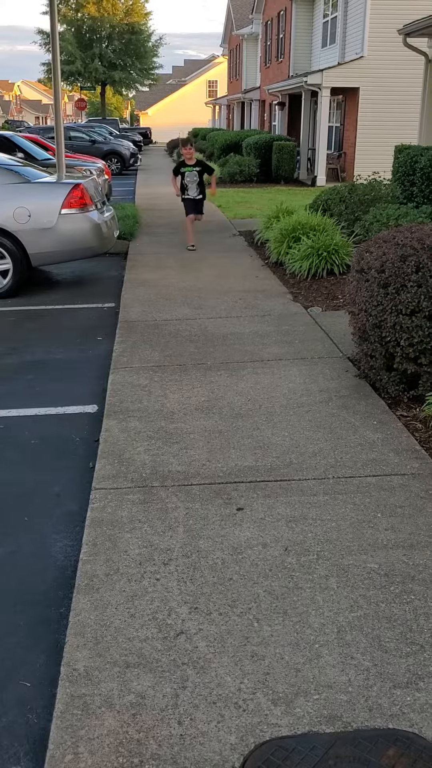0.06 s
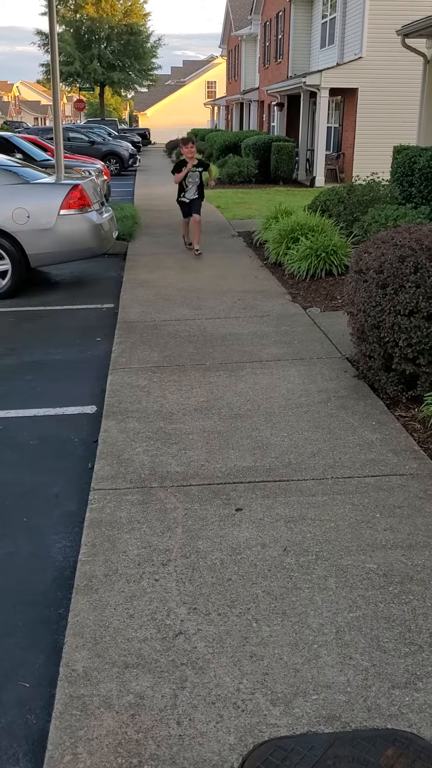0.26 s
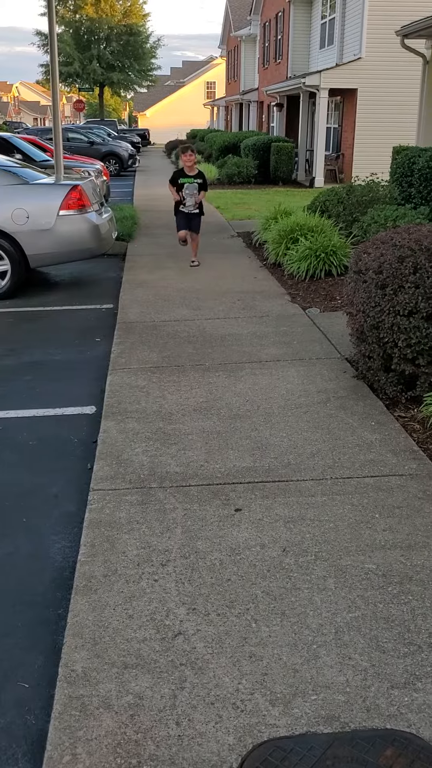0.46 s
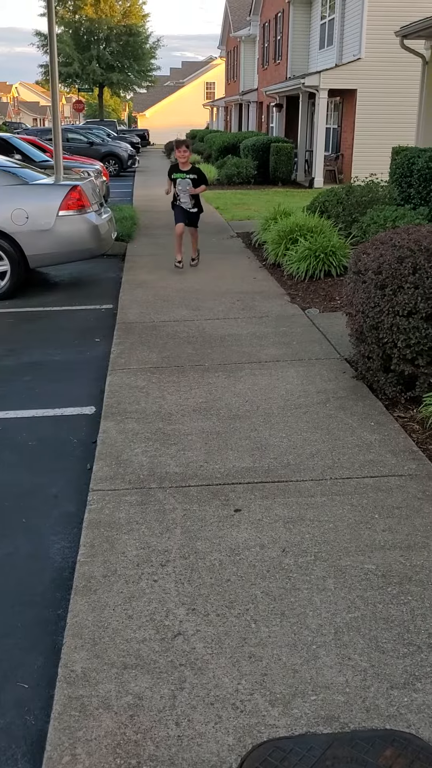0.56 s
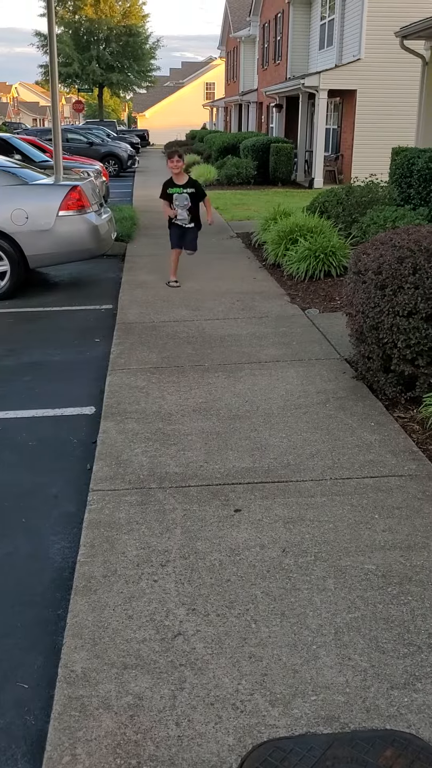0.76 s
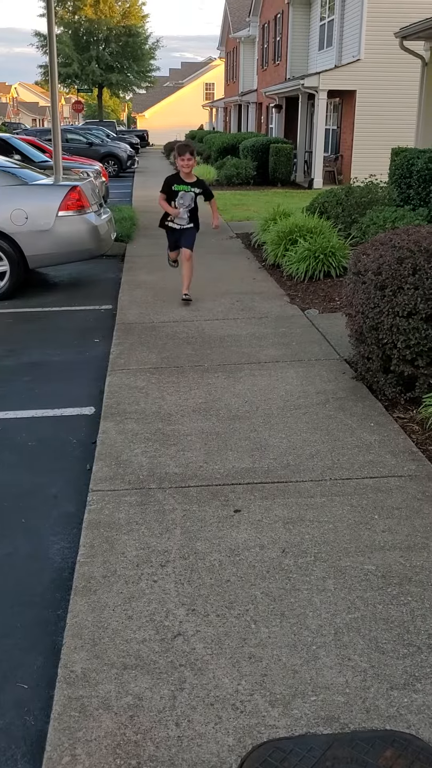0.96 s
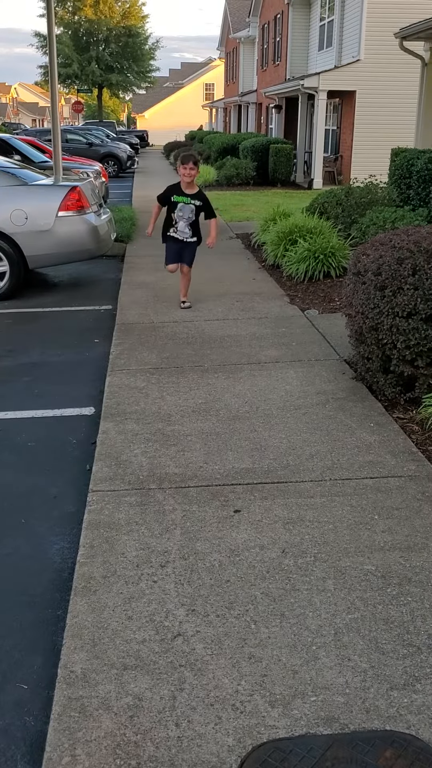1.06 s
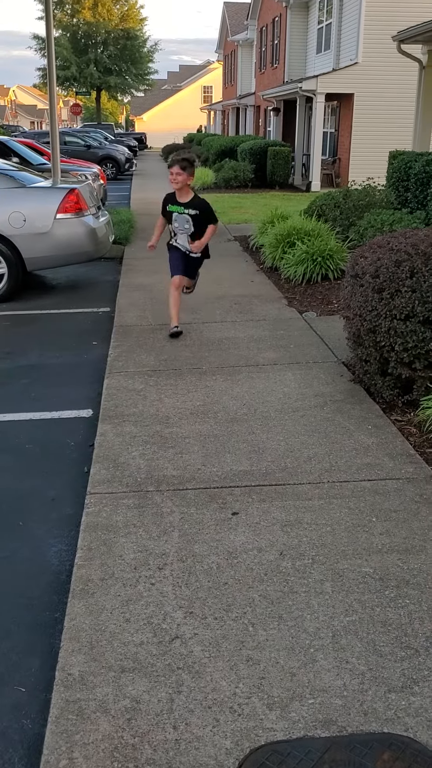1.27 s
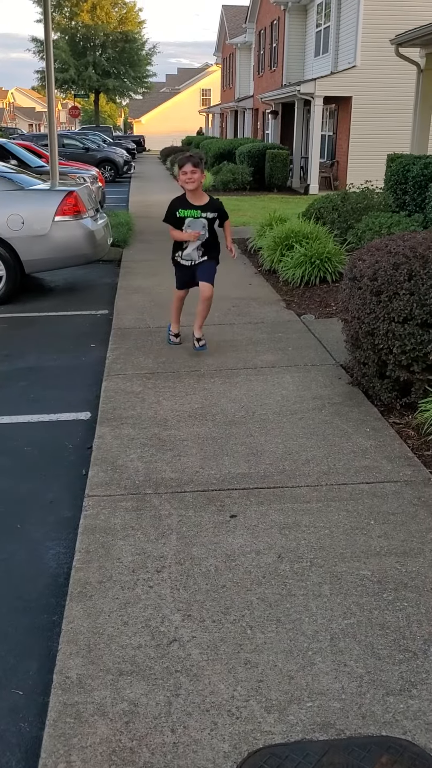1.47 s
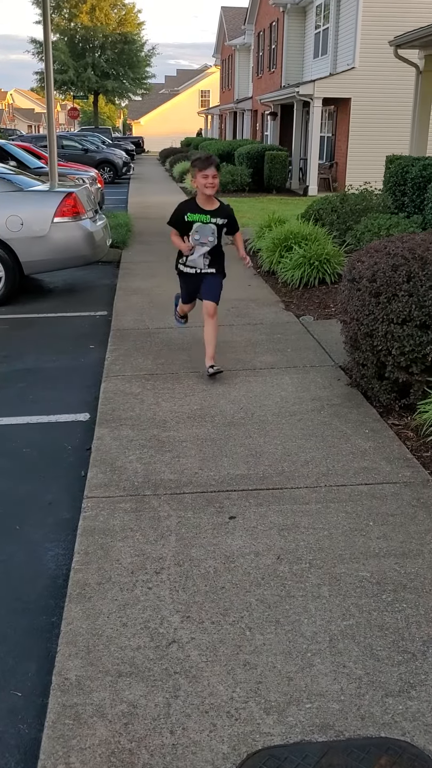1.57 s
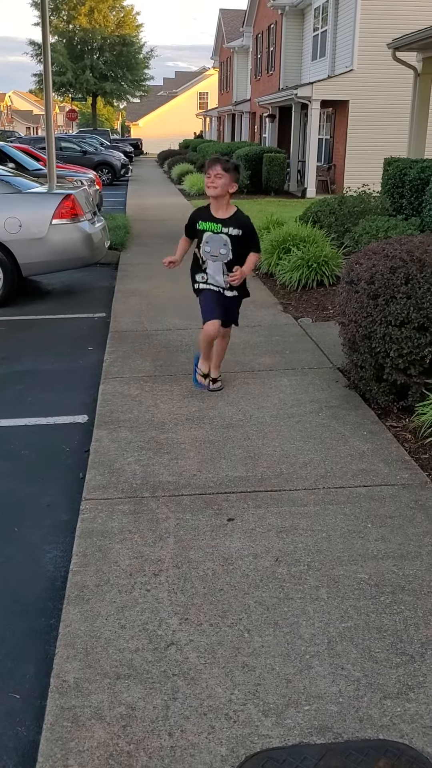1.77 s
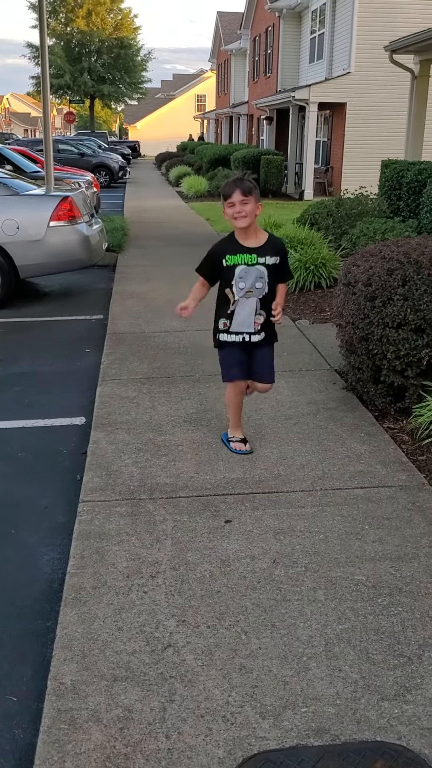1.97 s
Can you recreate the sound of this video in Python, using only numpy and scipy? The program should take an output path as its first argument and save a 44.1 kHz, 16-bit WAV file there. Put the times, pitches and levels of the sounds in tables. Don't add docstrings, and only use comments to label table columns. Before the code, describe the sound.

A child's flip-flops slap a concrete sidewalk at a steady run, approaching. Soft, distant slap at 0.15 s, firmer ones at 0.45 and 0.78, a softer one at 1.09, a hard bright crack at 1.37, the loudest at 1.68, and a duller, poppy slap at 1.99. Light heel taps, gritty scuffs and growing cloth swishes fall between; short street echoes, faint hiss, low traffic and hum.

```python
import sys
import numpy as np
from scipy import signal
from scipy.fft import rfft, irfft, next_fast_len
from scipy.io import wavfile
from scipy.ndimage import uniform_filter1d

SR = 44100
rng = np.random.default_rng(int(sys.argv[2]) if len(sys.argv) > 2 else 0)


def generate_wav(sig):
    pcm = np.round(np.clip(np.atleast_2d(sig).T, -1, 1) * 32767).astype(np.int16)
    wavfile.write(sys.argv[1], SR, pcm)


def volts_from_db(level):
    exponent = np.asarray(level, float) / 20
    return 10 ** exponent


N = 88729

# start_s, crack_db, sole_ring_hz, strap_ring_hz, echo_delay_s
SOLE_SLAPS = [
    (0.149, -27.5, 1670, 2800, 0.012),
    (.4537, -22.5, 1730, 2500, .0125),
    (0.7795, -23.5, 1660, 3700, .0132),
    (1.0858, -26, 3800, 3550, .0140),
    (1.3671, -17.5, 3400, 4220, .0155),
    (1.6810, -7.5, 1860, 2510, 0.016),
    (1.9905, -22, 3860, 2060, 0.019),
]
# freq_hz, t60_s
NEAR_DECAY = [(300, 0.27), (2500, 0.22), (8000, 0.14)]


def unit(x):
    return x / np.sqrt(np.mean(x ** 2) + 1e-20)


def along(points, hz):
    f, v = np.transpose(points)
    return np.interp(np.log(hz + 1), np.log(f + 1), v)


def filtered(x, response):
    m = next_fast_len(x.shape[-1] + 8192)
    spectrum = rfft(x, m) * response(np.fft.rfftfreq(m, 1 / SR))
    return irfft(spectrum, m)[..., :x.shape[-1]]


def peak(hz, centre_hz, width_hz):
    return 1j * hz * width_hz / (centre_hz ** 2 - hz ** 2 + 1j * hz * width_hz)


def add(track, start_s, x):
    part = track[..., round(start_s * SR):][..., :x.shape[-1]]
    part += x[..., :part.shape[-1]]


def rush(colour, patchy_db):
    # freq_hz, left_right_correlation
    likeness = [(60, 0.97), (180, 1), (550, 0.78), (1650, 0.28), (4970, -0.27), (15000, 0.14)]
    z = signal.stft(rng.standard_normal((2, N)), nperseg=512)[2]
    field = uniform_filter1d(rng.standard_normal(z.shape[1:]), 6, 0)
    field = uniform_filter1d(field, 8, 1)
    pair = signal.istft(z * volts_from_db(patchy_db * unit(field)), nperseg=512)[1][:, :N]

    def mid_side(hz):
        turn = np.arccos(np.clip(along(likeness, hz), -1, 1)) / 2
        return colour(hz) * [np.cos(turn), np.sin(turn)]

    mid, side = filtered(pair, mid_side)
    return unit(np.array([mid + side, mid - side]))


def traffic():
    # freq_hz, density_db_per_hz
    rumble = [(22, -77), (45, -2), (120, -9), (190, -10.5), (400, -14.5), (900, -21), (1600, -27),
              (2600, -48)]
    return volts_from_db(-51.5) * rush(lambda f: volts_from_db(along(rumble, f)) * (f < 4000), patchy_db=3.5)


def fan_hum():
    # centre_hz, width_hz, level_db
    bands = [(77, 54, -52.5), (117.2, 2.3, -56), (349.5, 73, -59)]
    hum = np.zeros((2, N))
    for hz, width_hz, db in bands:
        hum += volts_from_db(db) * rush(lambda f: np.abs(peak(f, hz, width_hz)) ** 2, patchy_db=-1.2)
    return hum


def gated_hiss():
    # freq_hz, density_db_per_hz
    hiss_colour = [(1200, 4), (2000, -10), (3200, -2.5), (5000, -14), (7500, -16.5), (9500, -9.5),
                   (11500, -19), (15800, -32)]
    level_db, depth_db, close_s, bend = -55, 25, 0.34, 1.24
    t = np.arange(N) / SR
    openings_s = np.array([-.16] + [row[0] - .01 for row in SOLE_SLAPS])
    since_s = t - openings_s[np.searchsorted(openings_s, t) - 1]
    gate = volts_from_db(level_db - depth_db * (since_s / close_s) ** bend)
    return gate * rush(lambda f: volts_from_db(along(hiss_colour, f)) * (f > 900), patchy_db=-2.5)


def cloth():
    # centre_s, level_db, half_length_s
    swings = [
        (0.048, -71.5, 0.051),
        (0.602, -67.5, 0.079),
        (0.883, -65.5, 0.11),
        (1.184, -62.5, 0.072),
        (1.315, -55, 0.065),
        (1.521, -57, 0.072),
        (1.82, -49, 0.11),
        (1.97, -60.5, 0.056),
    ]
    # freq_hz, density_db_per_hz
    cloth_colour = [(1470, -14), (2500, -9.5), (4710, -9.5), (6310, -5), (7360, -10.5), (9000, -3),
                    (11400, -19.5), (15800, -9.5)]
    t = np.arange(N) / SR
    swing = sum(volts_from_db(db) * np.exp(-((t - s) / half_s) ** 2) for s, db, half_s in swings)
    return swing * rush(lambda f: volts_from_db(along(cloth_colour, f)) * (f > 900), patchy_db=3.0)


def taps(track):
    # start_s, level_db, ring_hz, t60_s
    contacts = [(.060, -35, 860, 0.0096), (.142, -32.5, 356, 0.044), (0.281, -40, 620, 0.024),
                (.651, -42.5, 600, 0.028), (.766, -41, 526, 0.078), (1.0726, -28, 870, 0.016),
                (1.339, -41, 840, 0.023), (1.0721, -41, 1620, 0.01), (.4545, -31, 568, 0.018),
                (1.352, -35.5, 338, 0.039), (1.566, -39.5, 490, 0.025), (1.801, -31, 306, 0.02),
                (1.961, -38, 825, 0.014), (1.981, -33, 406, 0.033)]
    t = np.arange(3000) / SR
    onset = 1 - np.exp(-t / 0.0002)
    for s, db, hz, t60_s in contacts:
        add(track, s, -volts_from_db(db - 60 * t / t60_s) * np.sin(2 * np.pi * hz * t) * onset)


def tail(t60):
    hz, t, z = signal.stft(rng.standard_normal((2, SR // 2)), SR, nperseg=128)
    decay = volts_from_db(-60 * t / along(t60, hz)[:, None])
    mid_side_gain = np.array([hz > -1, 1.28 * hz / (hz + 900)])[..., None]
    mid, side = signal.istft(z * decay * mid_side_gain, SR, nperseg=128)[1]
    return np.array([mid + side, mid - side]) / np.linalg.norm(mid)


def scuffs(track):
    # start_s, level_db, centre_hz, length_s
    grains = [(0.144, -58.5, 2600, 0.0018), (0.151, -48.5, 1630, 0.0033), (0.423, -52, 4300, 0.0034),
              (0.4394, -40.5, 10400, 0.0017), (0.443, -36.5, 5100, .0014), (0.4382, -38.5, 1500, .0015),
              (0.4563, -33.5, 3890, 0.0011), (.7772, -34.5, 2700, .0008), (1.0879, -45.5, 2800, 0.00096),
              (1.0882, -59, 6540, 0.00092), (0.163, -50.5, 2900, 0.0034), (1.6775, -28, 3600, 0.00084),
              (0.772, -56, 3600, 0.0051), (0.7944, -48, 3960, 0.0013), (1.092, -72, 3520, .0015),
              (1.345, -51.5, 3960, 0.0043), (1.351, -47.5, 3820, 0.0035), (1.4, -68, 4130, 0.001),
              (1.404, -54, 3450, 0.0013), (1.468, -54, 2960, 0.0023), (1.666, -54, 3630, 0.0032),
              (1.714, -37.5, 2600, .0018), (1.72, -44, 3120, .006), (1.804, -49.5, 2090, .003),
              (1.831, -49.5, 1770, .006), (1.964, -45.5, 4870, .002), (1.978, -36, 3320, .002),
              (1.992, -29, 1100, .0015)]
    t = np.arange(3000) / SR
    for s, db, hz, length_s in grains:
        grit = filtered(rng.standard_normal(len(t)) ** 3, lambda f: peak(f, hz, hz * 0.68) ** 2)
        puff = volts_from_db(db) * unit(grit) * np.exp(-(t / length_s - 2) ** 2)
        add(track, s - length_s * 2, puff * volts_from_db([[.6], [-.6]]))
        add(track, s, volts_from_db(-10.5) * signal.fftconvolve(puff[None], tail(NEAR_DECAY), axes=1))


def echo(x, pop_echo_db=-14, spread_s=0.0031, top_hz=4300):
    def dulling(hz):
        bass_shelf = (volts_from_db(pop_echo_db) + 1j * hz / 600) / (1 + 1j * hz / 600)
        return bass_shelf / (1 + 1j * hz / top_hz) ** 2

    dull = filtered(x, dulling)
    smear = rng.standard_normal((2, 512)) * np.exp(-np.arange(512) / SR / spread_s)
    blur = signal.fftconvolve(dull[None], smear / np.linalg.norm(smear[0]))[:, :len(x)]
    return dull + 0.24 * blur


def street(track, start_s, x, delay_s):
    # freq_hz, t60_s
    far_decay = [(300, 1), (2500, 1), (8000, 0.94)]
    near_db, far_db, build_s, clump_db = -7.5, -27.5, .006, 4.0
    add(track, start_s, x)
    echo_db = -14.0 - 5.0 * (start_s - 1.76)
    add(track, start_s + delay_s, volts_from_db(echo_db) * echo(x))
    wet = volts_from_db(near_db) * tail(NEAR_DECAY) + volts_from_db(far_db) * tail(far_decay)
    wet *= 1 - np.exp(-np.arange(wet.shape[1]) / SR / build_s)
    clumps = unit(uniform_filter1d(rng.standard_normal(wet.shape[1]), size=130))
    wet *= volts_from_db(clump_db * clumps - 4)
    add(track, start_s + .002, signal.fftconvolve(x[None], wet, axes=1))


def bell(t, rise_s, fall_s):
    return np.exp(-(t / np.where(t < 0, rise_s, fall_s)) ** 2)


def crack(t, sole):
    # freq_hz, level_db
    rubber = [(300, -57), (800, 4), (1800, -4.5), (3800, -11), (5200, -18.5), (10000, -16), (16000, -51)]
    blow = 1.0 * (np.abs(t) == np.abs(t).min())
    snap = filtered(blow, lambda f: sole(f) / (1 + 1j * f / 6000) ** 4)
    noise = rng.standard_normal(len(t))
    grit = unit(filtered(noise, lambda f: volts_from_db(along(rubber, f)) * (0.92 + sole(f))))
    return snap / snap.max() + volts_from_db(-17.0) * bell(t, rise_s=.0028, fall_s=.003) * grit


def fizz(t, centre_hz=6700, half_s=0.0026):
    noise = rng.standard_normal((2, len(t)))
    return unit(filtered(noise, lambda f: peak(f, centre_hz, centre_hz))) * np.exp(-(t / half_s) ** 4)


def slaps(track):
    # start_s, level_db, pitch_hz
    air_pops = [
        (0.1504, -60, 370),
        (0.4546, -25.5, 284),
        (0.7794, -28, 322),
        (1.0873, -30.5, 310),
        (1.3674, -22.5, 352),
        (1.6801, -18.5, 315),
        (1.9922, -16, 353),
    ]
    # centre_hz, width_hz, level_db
    foot_bed = [(740, 320, -8), (1150, 210, -15.5), (2230, 330, -12)]
    ring_q, strap_db, fizz_db = 6.5, -6, -34
    t = np.arange(2048) / SR - .008
    for (s, crack_db, hz, strap_hz, delay_s), (pop_s, pop_db, pop_hz) in zip(SOLE_SLAPS, air_pops):
        rings = [(hz, hz / ring_q, 0), (strap_hz, strap_hz / ring_q, strap_db)] + foot_bed
        sole = lambda f: sum(volts_from_db(db) * peak(f, c, w) for c, w, db in rings)
        add(track, s + t[0], volts_from_db(crack_db + fizz_db) * fizz(t))
        u = t + s - pop_s
        pop = np.cos(2 * np.pi * pop_hz * u) * bell(u, rise_s=0.0016, fall_s=0.0016)
        street(track, s + t[0], volts_from_db(crack_db) * crack(t, sole) + volts_from_db(pop_db) * pop, delay_s)


def scene():
    background = traffic() + fan_hum() + gated_hiss() + cloth()
    feet = np.zeros((2, N))
    taps(feet)
    scuffs(feet)
    slaps(feet)
    lag_s = 2.5e-5
    side = np.array([[1], [-1]])
    return filtered(feet, lambda hz: np.exp(1j * np.pi * side * hz * lag_s)) + background


def band_limit(x):
    return signal.sosfilt(signal.butter(12, 17050, fs=SR, output="sos"), x)


def record(dry):
    # freq_hz, left_minus_right_db
    port_lean = [(60, 0), (240, -3.5), (950, -2), (3770, -2), (15000, -2.5)]
    side = np.array([[.5], [-.5]])
    mix = filtered(dry, lambda hz: volts_from_db(side * along(port_lean, hz)) * (hz < 15900))
    return band_limit(mix)


dry = scene()
out = record(dry)
generate_wav(out)
```